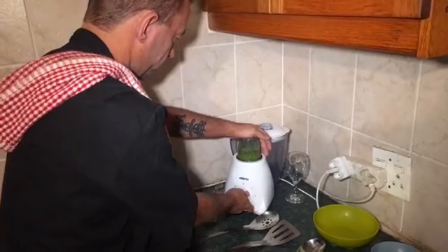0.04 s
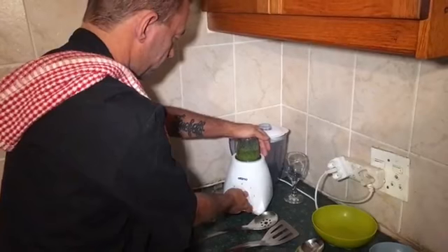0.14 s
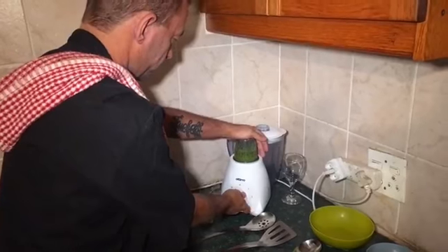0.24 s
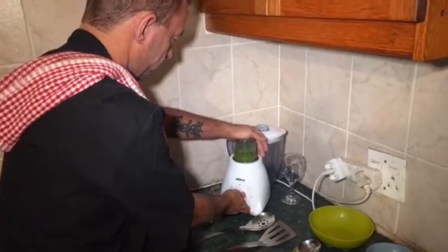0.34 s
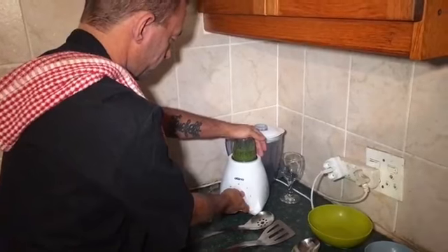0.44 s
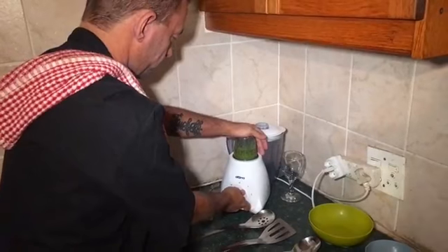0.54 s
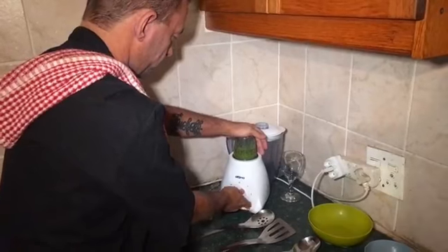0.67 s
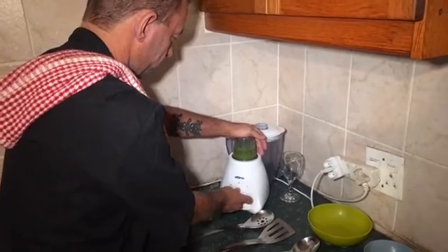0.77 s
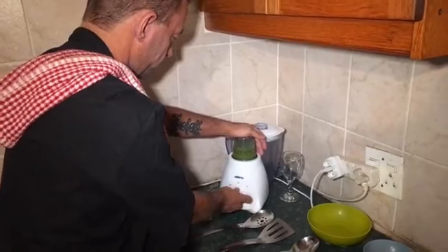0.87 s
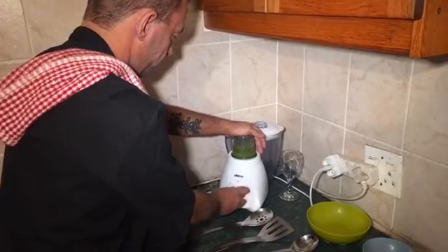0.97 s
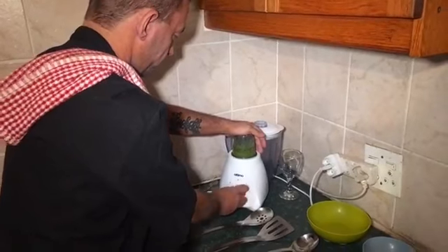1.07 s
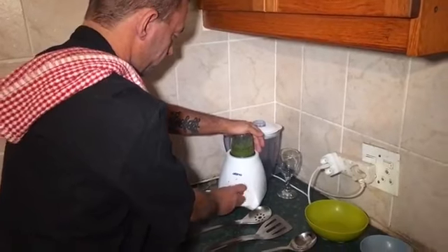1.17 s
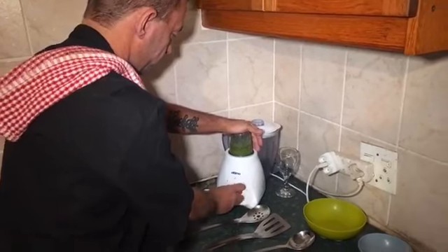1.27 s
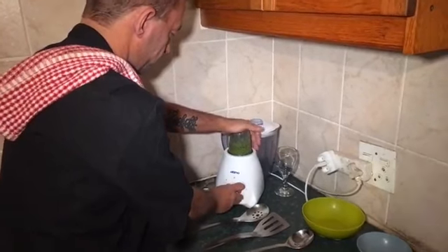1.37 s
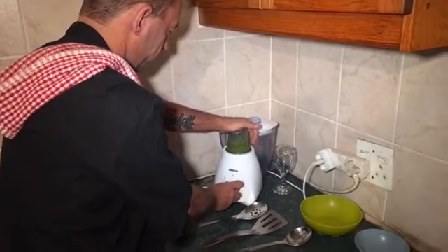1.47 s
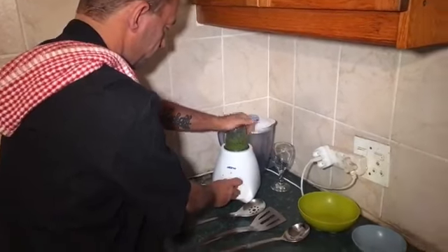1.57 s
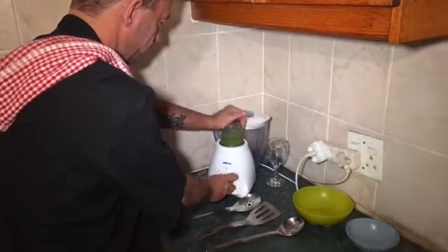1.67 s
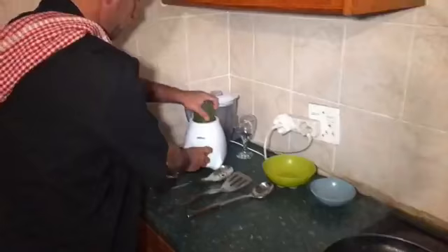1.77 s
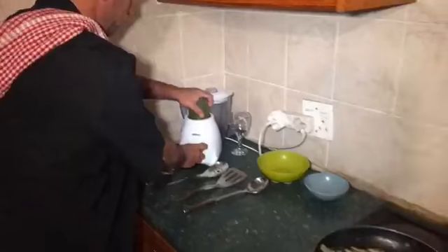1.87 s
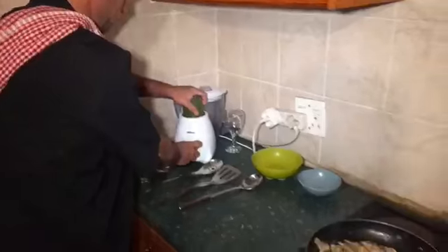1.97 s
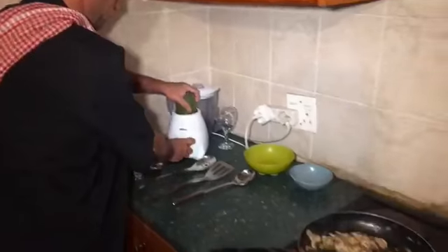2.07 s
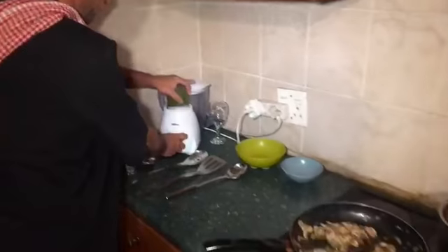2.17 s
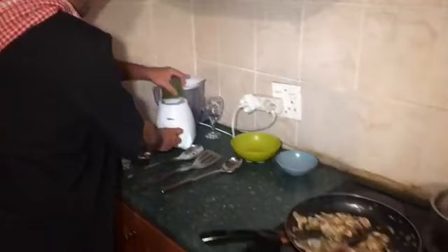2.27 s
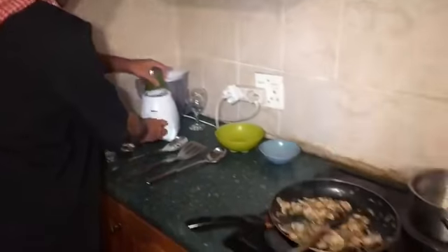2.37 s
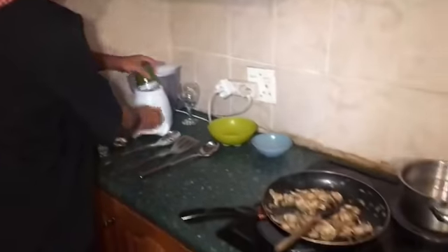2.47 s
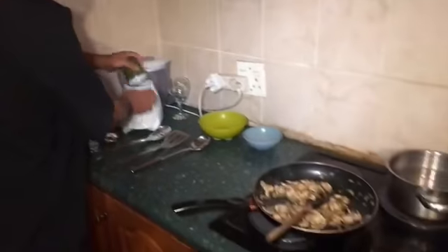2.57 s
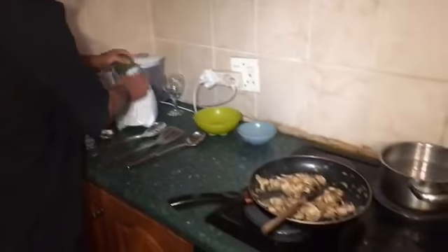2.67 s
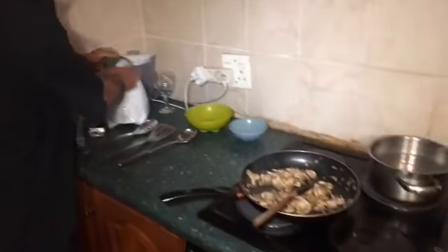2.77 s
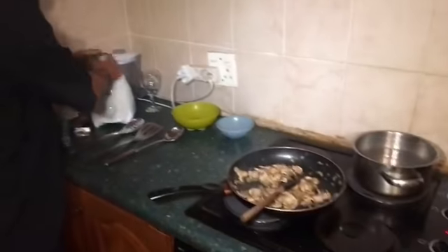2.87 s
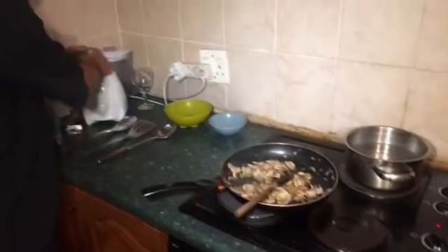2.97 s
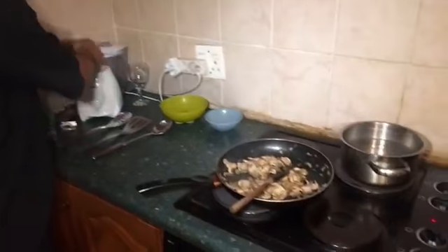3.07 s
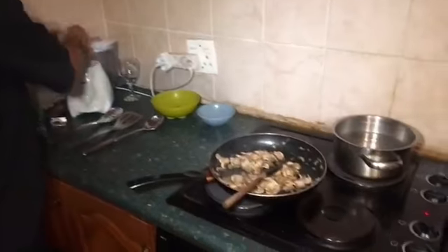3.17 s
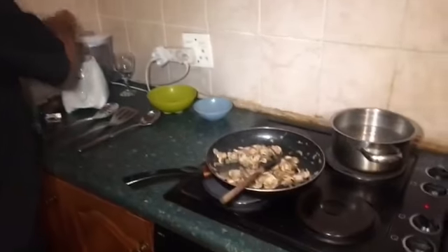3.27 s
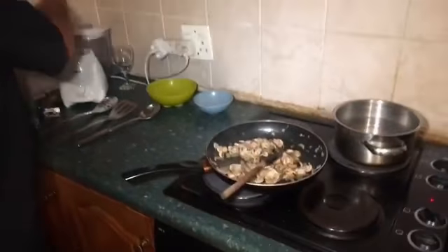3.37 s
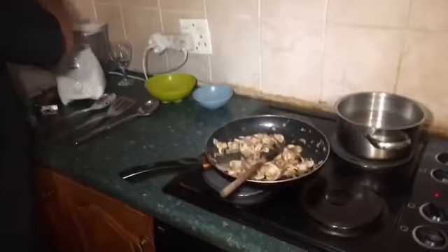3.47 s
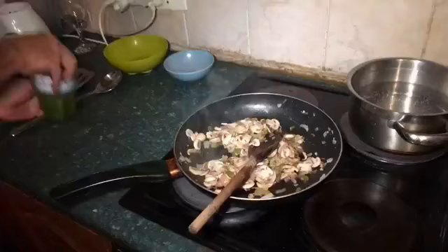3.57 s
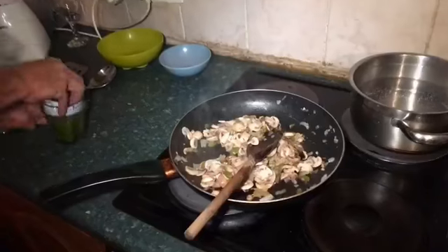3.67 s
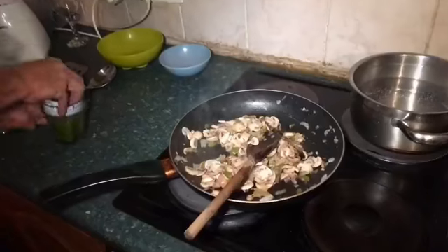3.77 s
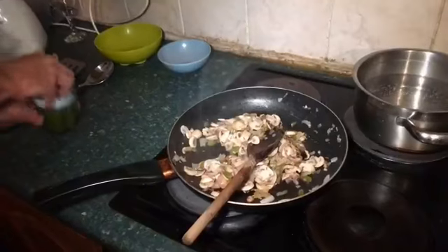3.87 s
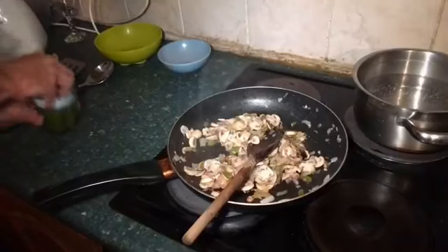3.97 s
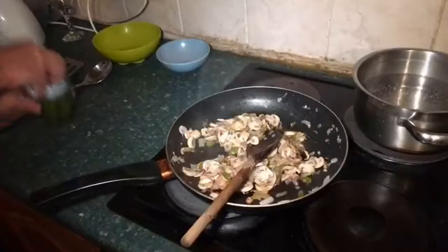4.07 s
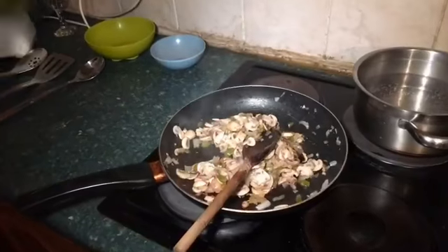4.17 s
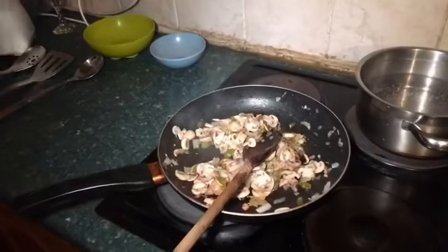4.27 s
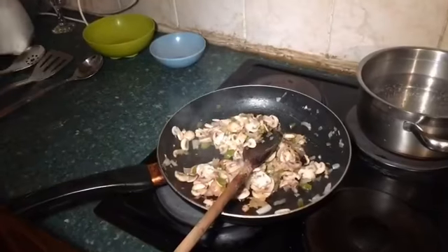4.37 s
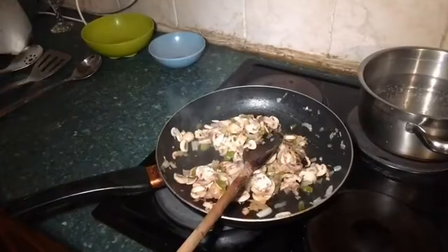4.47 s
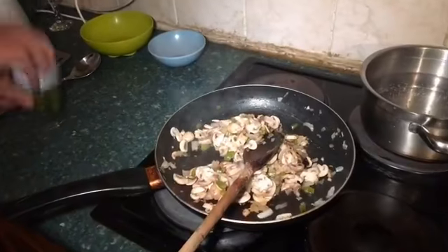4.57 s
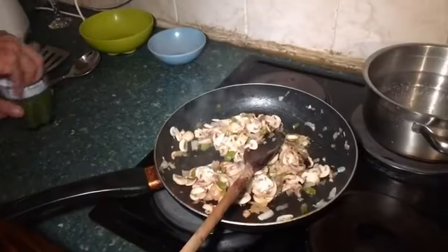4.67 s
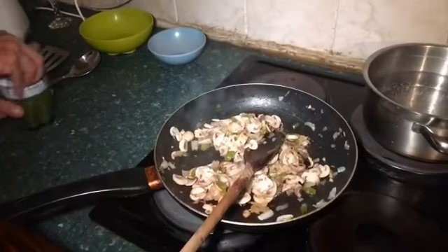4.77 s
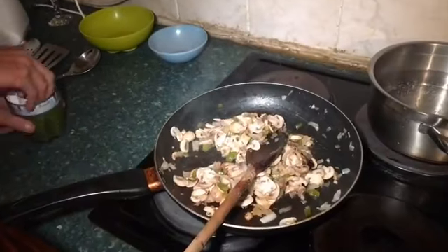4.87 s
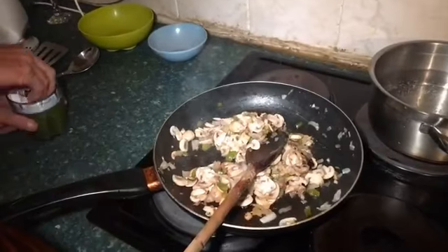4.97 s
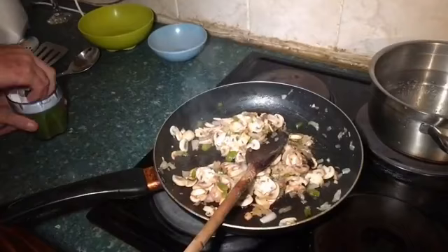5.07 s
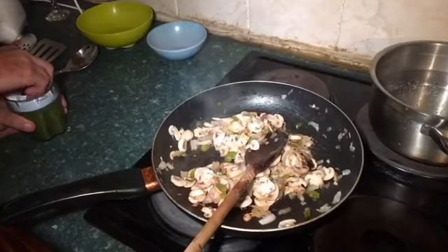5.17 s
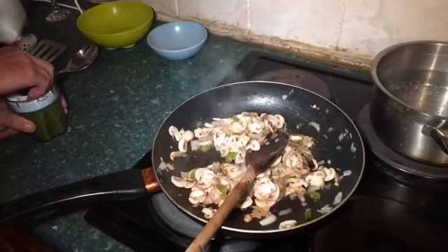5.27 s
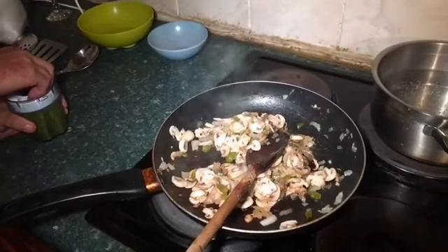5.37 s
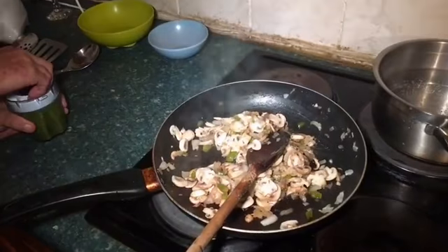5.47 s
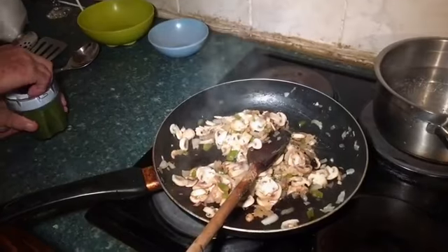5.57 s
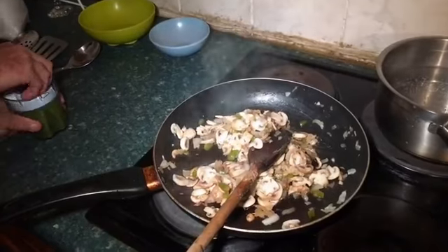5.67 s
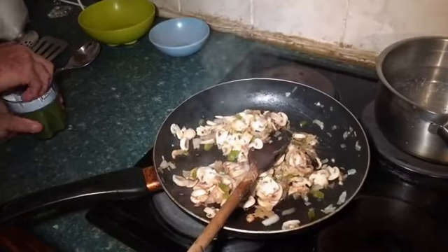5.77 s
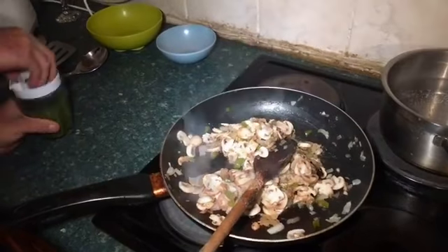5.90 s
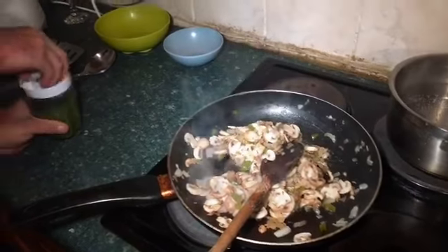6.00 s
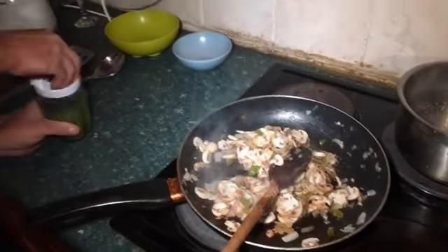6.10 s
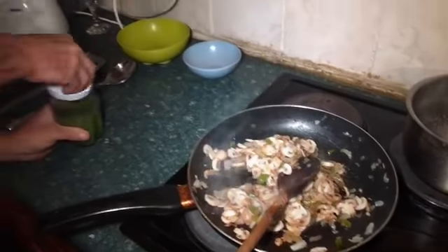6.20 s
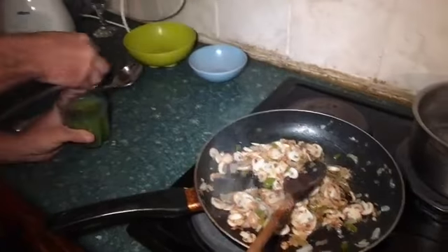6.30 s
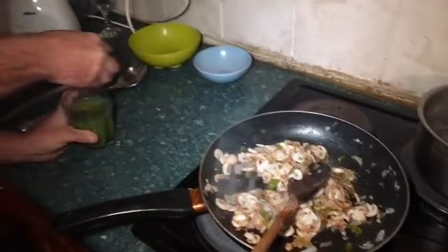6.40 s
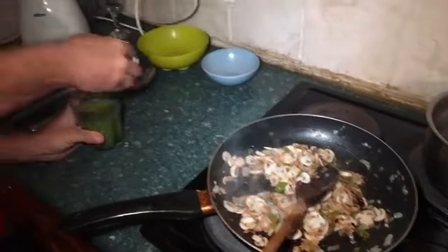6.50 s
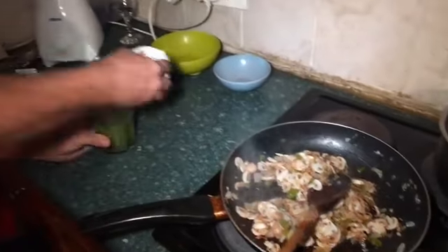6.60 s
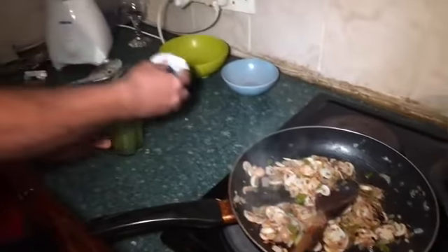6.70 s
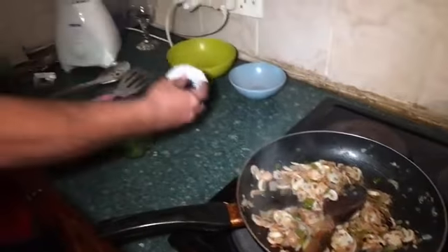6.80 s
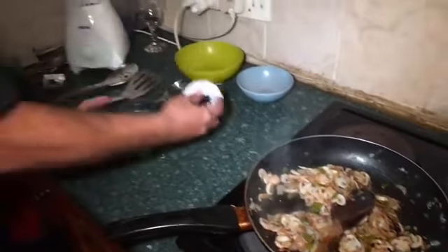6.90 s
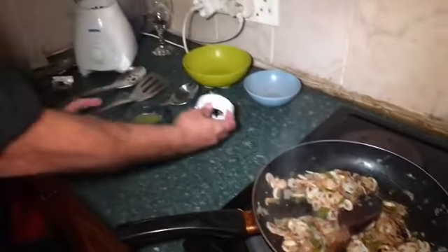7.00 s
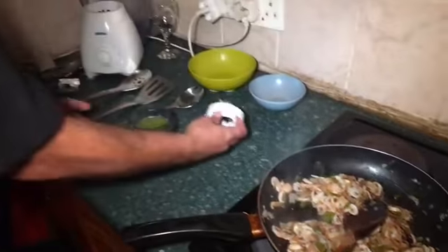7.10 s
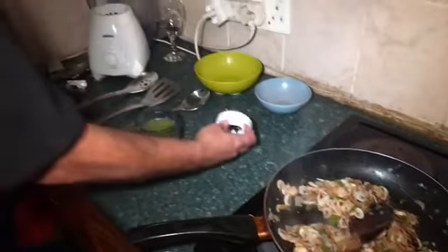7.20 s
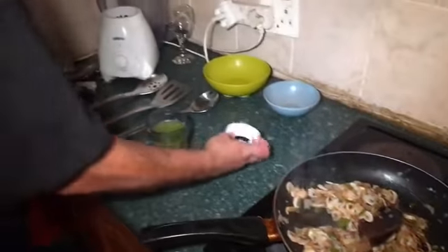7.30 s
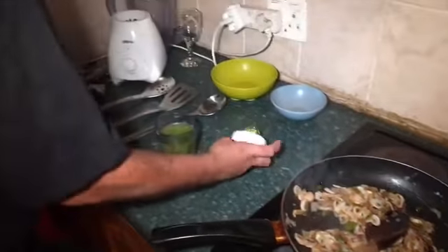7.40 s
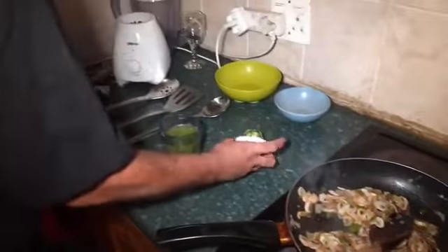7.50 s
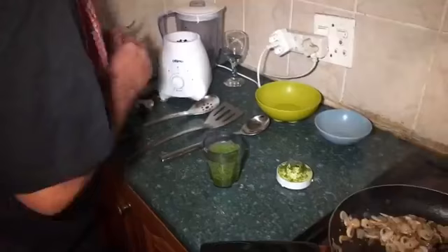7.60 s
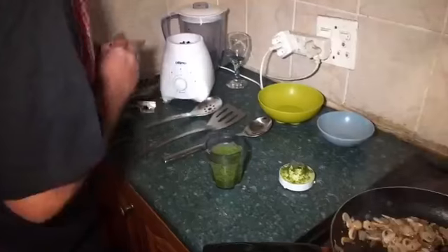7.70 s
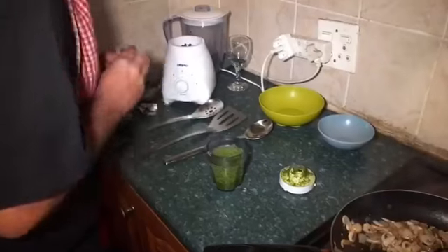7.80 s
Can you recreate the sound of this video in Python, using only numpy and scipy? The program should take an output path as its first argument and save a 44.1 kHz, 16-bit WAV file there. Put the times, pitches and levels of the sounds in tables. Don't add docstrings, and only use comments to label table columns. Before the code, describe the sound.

In a small tiled kitchen, a blender already slowing down churns wet pulp, its housing rattling and hum falling in pitch until it stops after about a second. Quiet frying crackle continues. Faint bumps, then a jar knock and a hard clack on stone, then a lid releasing two short airy spurts, and light ticks. A close handheld microphone picks up low rumbles and handling thumps.

```python
import sys
import numpy as np
from scipy import signal
from scipy.fft import rfft, irfft
from scipy.io import wavfile
from scipy.ndimage import uniform_filter1d

SR = 44100
rng = np.random.default_rng(int(sys.argv[2]) if len(sys.argv) > 2 else 0)


def convert_level_to_amplitude(level_db):
    exponent = np.asarray(level_db, float) / 20
    return 10 ** exponent


def transcribe(u):
    v = np.clip(np.atleast_2d(u).T, -1, 1)
    q = np.round(v * 32767).astype(np.int16)
    wavfile.write(sys.argv[1], SR, q)


N = 346185
T = np.arange(N) / SR

# centre in Hz, width in Hz, level in dB.
MAINS_HUM = [(52.1, 11, -56.5), (98.2, 3.9, -60.5), (146.3, 2.25, -66.5), (255.5, 4.3, -70.5),
             (440, 15, -67)]
# frequency in Hz, density in dB per Hz.
KITCHEN_SPECTRUM = [(71, -28), (120, -19), (173, -6.5), (257, -3), (381, -7.5), (439, -5.5), (498, -4.5),
                    (537, -4.5), (2500, -21.5), (3250, -24), (5500, -120)]
# centre in seconds, deep swing in dB,
# half length in seconds, flutter above the deep swing in dB.
GUSTS = [(0.0, -29.5, 0.058, 8), (0.167, -35, 0.086, 9), (0.397, -47.5, 0.15, 3.5), (0.678, -51, 0.21, 8),
         (1.14, -56, 0.024, -23), (1.37, -41, 0.049, -21), (2.374, -31.5, 0.021, -3),
         (2.53, -40, 0.083, -9), (2.686, -51.5, 0.1, 2.5), (2.795, -42, .03, -15), (2.89, -31, 0.11, -7.5),
         (3.154, -47, .05, -17), (3.31, -39, 0.033, -17), (3.53, -39, 0.046, -8), (3.706, -47.5, 0.032, 6),
         (3.836, -29.5, .07, -19), (4.024, -50.5, 0.023, 14.5), (4.29, -50, 0.25, -13),
         (4.668, -31.5, 0.058, 9), (4.764, -23, 0.06, 1.5), (4.86, -23.5, 0.045, -1),
         (4.97, -36, 0.088, 9.5), (5.267, -44.5, 0.082, -4), (6.256, -48.5, 0.048, 8),
         (6.683, -20, .022, -8), (6.772, -37.5, 0.033, -7), (7.104, -41.5, 0.054, -16),
         (7.284, -30, 0.077, -14), (7.728, -29.5, .04, -12), (7.84, -40, 0.071, 8)]
# start in seconds, peak in dB, frequency in Hz, 60 dB decay in seconds.
JOLTS = [
    (0.001, -14, 60, 0.077),
    (2.358, -23.5, 59, 0.15),
    (4.004, -21, 107, 0.054),
    (4.836, -21, 60, 0.084),
    (6.661, -17, 35.4, 0.28),
    (6.218, -28.5, 115, 0.064),
]
# time in seconds, level in dB.
FRYING_LEVEL = [
    (0.9, -48.5),
    (1.87, -49.5),
    (3.61, -49),
    (4.13, -47.5),
    (4.46, -48),
    (6.9, -47.5),
    (7.3, -48),
    (7.85, -46.5),
]
# frequency in Hz, density in dB per Hz.
SIZZLE_SPECTRUM = [(590, -19), (1000, -13.5), (2020, -16), (2900, -14), (3690, -11), (5000, -8.5),
                   (7000, -3), (9000, -1), (10400, -2.5), (11700, -1.5), (13500, -6.5), (15800, -7)]
# peak time in seconds, peak in dB, rise in seconds, fall in dB per second.
SPURTS = [
    (6.656, -32.5, 0.0042, 240),
    (6.671, -14.5, 0.0025, 540),
    (6.701, -27.5, 0.018, 123),
    (6.769, -29.5, 0.0082, 300),
    (6.797, -33, 0.017, 210),
]
# frequency in Hz, density in dB per Hz.
SPURT_SPECTRUM = [(2350, -44), (4000, -9), (5610, -10.5), (6630, -1.5), (8590, -2), (9420, 0.5),
                  (10400, -4), (14800, 2), (15800, -4.5)]
# start in seconds, level in dB,
# frequency in Hz, length in seconds.
WHISTLES = [(0.001, -31.5, 5100, 0.038), (0.215, -37, 310.4, 0.081), (0.13, -38.5, 2084, 0.056),
            (0.19, -49, 4000, 0.024), (0.58, -48, 5100, 0.034), (5.261, -38.5, 762, 0.034),
            (5.364, -56, 885, 0.029), (5.580, -58, 423, 0.17), (6.212, -46, 4000, 0.0078),
            (6.652, -36, 9500, .022), (6.680, -43, 7550, 0.031), (6.686, -43, 9050, 0.026),
            (6.761, -31.5, 6670, 0.024), (6.760, -34, 9950, .02), (6.787, -34, 9150, 0.018),
            (6.811, -34, 9150, .018), (6.790, -46, 8250, .03)]
# start in seconds, peak in dB, body in Hz, contact in seconds.
BUMPS = [(1.544, -45, 310, 0.0074), (1.683, -43.5, 305, 0.036), (1.844, -40, 310, .016),
         (3.548, -47, 850, 0.019), (4.003, -22, 515, .0055), (5.204, -46, 645, 0.0083),
         (5.2625, -34.5, 714, 0.017), (5.364, -44, 880, 0.019), (6.614, -37, 880, 0.012),
         (7.836, -27, 820, .008), (4.004, -29, 1320, .011), (4.0028, -31, 300, 0.019),
         (4.158, -43, 480, 0.0067), (5.334, -31, 840, 0.015), (5.335, -36, 514, 0.0096),
         (6.213, -36, 255, 0.013), (6.222, -49.5, 1150, 0.049), (6.719, -29, 2380, 0.0046)]
# start in seconds, peak in dB, body in Hz,
# contact in seconds, upper ring in Hz.
CLACKS = [
    (1.426, -41, 317, 0.0076, 3560),
    (1.787, -50.5, 440, 0.027, 3920),
    (1.865, -42.5, 1160, 0.044, 2410),
    (4.836, -16.5, 536, .0043, 3400),
    (4.837, -19.5, 1090, 0.0081, 1410),
    (5.31, -42, 1500, 0.033, 3630),
    (6.688, -24.5, 635, 0.0096, 1070),
]
# start in
# seconds, peak in dB, ring in Hz, contact in seconds.
TICKS = [(2.284, -45.5, 4350, .0045), (2.790, -47, 2370, .005), (3.825, -42, 4280, .003),
         (5.327, -29, 9000, 0.0054), (4.006, -37, 5030, 0.013), (4.836, -19.5, 8560, 0.0062),
         (6.212, -38, 7000, 0.0056), (7.118, -39, 8700, .006), (7.199, -29.5, 11500, 0.0036),
         (7.206, -42, 8300, 0.0026), (7.283, -43, 4000, 0.0074), (7.294, -37.5, 5870, 0.0054),
         (7.304, -44, 3000, .004), (7.491, -44, 11500, 0.0074), (3.965, -40, 8500, .003),
         (4.008, -33, 11000, 0.025), (4.061, -40, 9300, .003)]
# centre in Hz, width in Hz, level in dB.
HOUSING_MODES = [(300, 96, -0.5), (476, 85, -4.5), (762, 34, -2), (774, 32, -1), (1150, 33, -1.5),
                 (1760, 80, -4), (2084, 46, 1.5), (2274, 69, -7.5), (2380, 47, -21), (4000, 74, -15),
                 (5060, 50, -7), (6100, 160, -8)]
# frequency in Hz, density in dB per Hz.
CHURN_SPECTRUM = [(240, -40), (400, -16), (615, -10.5), (729, 1), (961, -9), (1550, -16.5), (2070, -10.5),
                  (3190, -16), (6990, -10), (15800, -19.5)]
# centre in seconds, level in dB, half length in seconds.
SLOSHES = [
    (0.064, -33.5, 0.02),
    (0.153, -40.5, 0.011),
    (0.29, -42.5, 0.026),
    (0.357, -42.5, 0.021),
    (0.444, -44.5, 0.017),
    (0.53, -35.5, 0.018),
    (0.628, -45, 0.019),
    (0.699, -41.5, 0.019),
    (0.772, -45.5, 0.016),
]
# multiple of shaft speed, level in dB.
SHAFT_ORDERS = [(1, 2.5), (2, -9), (3, -18.5), (4, -17)]
OFFSETS = [
    [-.0070],
    [-.0090],
]


def level(x, db):
    return x * convert_level_to_amplitude(db) / np.sqrt(np.mean(x ** 2))


def colour(x, shape):
    hz, db = np.transpose(shape)
    log_hz = np.log(np.arange(N // 2 + 1) * SR / N + 1)
    return level(irfft(rfft(x) * convert_level_to_amplitude(np.interp(log_hz, np.log(hz), db)), N), 0)


def ring(x, hz, width):
    return signal.lfilter(*signal.iirpeak(hz, hz / width, fs=SR), x)


def band(x, lo_hz, hi_hz, order=2):
    sos = signal.butter(order, [lo_hz, hi_hz], "band", fs=SR, output="sos")
    return level(signal.sosfilt(sos, x), 0)


def noise():
    return rng.standard_normal(N)


def walk(rate):
    k = int(SR / rate)
    held = np.repeat(rng.standard_normal(N // k + 1), k)
    return 1.38 * uniform_filter1d(uniform_filter1d(held, k), k)[:N]


def even(x, span_s):
    return x / np.sqrt(uniform_filter1d(x ** 2, int(span_s * SR)) + 0.047)


def add(out, s, sound):
    i = int(s * SR)
    out[i:i + len(sound)] += sound[:N - i]


def kitchen():
    hum = sum(level(ring(ring(noise(), hz, width), hz, width), db) for hz, width, db in MAINS_HUM)
    return hum + colour(noise(), KITCHEN_SPECTRUM) * convert_level_to_amplitude(-60 + 2.9 * walk(5.2))


def jolt(hz, t60):
    t = T[:int(0.3 * SR)]
    return np.sin(2 * np.pi * hz * t) * 1000. ** (-t / t60)


def draught():
    deep_level = convert_level_to_amplitude(-56.5 + 4.5 * walk(9))
    flutter_level = convert_level_to_amplitude(-60)
    for s, db, half_s, up_db in GUSTS:
        swell = np.exp(-((T - s) / half_s) ** 2)
        deep_level = deep_level + convert_level_to_amplitude(db) * swell
        flutter_level = flutter_level + convert_level_to_amplitude(db + up_db) * swell
    deep = even(band(noise(), 18.9, 47.0, order=3), 0.078)
    flutter = even(band(noise(), 42.7, 126, order=3), 0.0604) + 0.18 * band(noise(), 154, 288)
    out = convert_level_to_amplitude(-2.5) * (deep_level * deep + flutter_level * convert_level_to_amplitude(2.8 * walk(35)) * flutter)
    for s, db, hz, t60 in JOLTS:
        add(out, s, -convert_level_to_amplitude(db) * jolt(hz, t60))
    return out


def frying():
    bursts_per_s = 1500
    bursts = (rng.random(N) < bursts_per_s / SR) * convert_level_to_amplitude(1.6 * rng.exponential(1, N)) * noise()
    smear = rng.standard_normal(160) * np.exp(-np.arange(160) / 30)
    pops = level(signal.fftconvolve(bursts, smear)[:N], 3.1)
    patches = np.zeros(N)
    for lo_hz in 700 * 2 ** np.arange(0, 4.6, 0.5):
        patch = np.sqrt(lo_hz) * band(noise() + pops, lo_hz, min(lo_hz * 2 ** 0.5, 20000))
        patches += patch * convert_level_to_amplitude(0.5 * walk(11) + 0.45 * walk(2.59))
    spit = convert_level_to_amplitude(0.8 * walk(22))
    s, db = np.transpose(FRYING_LEVEL)
    return colour(patches, SIZZLE_SPECTRUM) * spit * convert_level_to_amplitude(np.interp(T, s, db) + 2)


def whistle(hz, length_s):
    t = T[:int(length_s * SR)]
    n = len(t)
    swell = np.sqrt(np.sin(np.pi * t / length_s)) * convert_level_to_amplitude(2.4 + 3.1 * walk(147)[:n])
    cycles = hz * np.cumsum(1 + 0.0041 * walk(190)[:n]) / SR
    return swell * np.sin(2 * np.pi * cycles)


def lid():
    flow = np.zeros(N)
    for s, db, rise_s, fall_db in SPURTS:
        fall = convert_level_to_amplitude(db - fall_db * np.maximum(T - s, 0))
        flow += fall * np.exp(np.clip((T - s) / rise_s, -50, 0))
    sputter = convert_level_to_amplitude(1.0 * walk(820) + 1.4 * walk(160))
    jet = colour(noise(), SPURT_SPECTRUM) + convert_level_to_amplitude(-17.5) * band(noise(), 310, 2540)
    out = flow * sputter * jet
    for s, db, hz, length_s in WHISTLES:
        add(out, s, convert_level_to_amplitude(db) * whistle(hz, length_s))
    return out


def knock(hz, contact, crack_db, upper_hz):
    (grit, crack), t = rng.standard_normal((2, 4096)), T[:4096]
    push = np.exp(-(t / contact) ** 2) * np.clip(t / 0.00027, 0, 1)
    body = ring(push * grit, hz, 0.12 * hz)
    upper = ring(push * crack, upper_hz, 0.051 * upper_hz)
    thud = signal.lfilter([0.2], [1, -0.9], grit) * push
    dulled = signal.lfilter(*signal.butter(1, 9000, fs=SR), crack)
    chatter = dulled * (0.99 * push + 0.5 * np.exp(-t / 0.02))
    sharp = convert_level_to_amplitude(crack_db - 2.5) * (upper / np.abs(upper).max() + chatter)
    return body / np.abs(body).max() + convert_level_to_amplitude(-33.5) * thud + sharp


def tick(hz, contact):
    t = T[:2048]
    push = np.exp(-(t / contact) ** 2) + 0.4 * np.exp(-t / 0.018)
    sound = ring(rng.standard_normal(len(t)) * push, hz, 0.49 * hz)
    return sound / np.abs(sound).max()


def knocks():
    out = np.zeros(N)
    for s, db, hz, contact in BUMPS:
        add(out, s, convert_level_to_amplitude(db) * knock(hz, contact, -23.5, 2 * hz))
    for s, db, hz, contact, upper_hz in CLACKS:
        add(out, s, convert_level_to_amplitude(db) * knock(hz, contact, -4.5, upper_hz))
    for s, db, hz, contact in TICKS:
        add(out, s, convert_level_to_amplitude(db + 4) * tick(hz, contact))
    return out


def room(x):
    t60_s, tail_db = 0.39, -14.5
    t = T[:int(0.6 * SR)]
    tail = rng.standard_normal(len(t)) * 1000. ** (-t / t60_s) * np.clip(t / 0.003, 0, 1)
    tail = signal.lfilter(*signal.butter(1, [820, 2620], "band", fs=SR), tail)
    return x + convert_level_to_amplitude(tail_db) * signal.fftconvolve(x, tail / np.sqrt(np.sum(tail ** 2)))[:N]


def blender():
    start_hz, coast_s, stall_s, stall_fade_s = 210.3, 0.81, 1.01, 0.11
    hz = start_hz * np.exp(-T / coast_s)
    lost = T / coast_s / np.log(2)
    turn = 2 * np.pi * np.cumsum(hz * (1 + 0.013 * walk(29.5))) / SR
    beat = 1 + 0.09 * np.cos(2 * turn)
    lumps = convert_level_to_amplitude(walk(90.9))

    drive = noise() * beat * lumps
    rattle = level(sum(convert_level_to_amplitude(db) * ring(drive, f, width) for f, width, db in HOUSING_MODES), 0)
    rattle = rattle * convert_level_to_amplitude(1.2 * walk(26.6))
    hiss = colour(noise() * beat, CHURN_SPECTRUM) * lumps
    churn = convert_level_to_amplitude(-33.5 - 13.5 * lost) * rattle + convert_level_to_amplitude(-28.5 - 12.5 * lost) * hiss
    settled = convert_level_to_amplitude(-1.5 * np.clip((T - 0.39) / 0.015, 0, 1))

    shaft = np.zeros(N)
    for k, db in SHAFT_ORDERS:
        shaft += convert_level_to_amplitude(db + 2.7 * walk(24.3)) * np.sin(k * turn + 0.41 * walk(30.7))
    stand_db = 9 / (1 + ((hz - 108) / 24) ** 4)
    hum = convert_level_to_amplitude(-42 - 8.5 * lost + stand_db) * shaft

    running = np.clip((stall_s - T) / stall_fade_s, 0, 1)
    slosh = sum(convert_level_to_amplitude(db) * np.exp(-((T - s) / half_s) ** 2) for s, db, half_s in SLOSHES)
    return running * (settled * churn + hum) + slosh * (hiss + 0.59 * rattle)


def scene():
    mono = kitchen() + draught() + frying() + lid() + room(knocks()) + blender()
    return np.array([mono, mono])


def band_limit(x):
    return signal.sosfilt(signal.butter(12, 16060, fs=SR, output="sos"), x)


def record(dry):
    top_cut = signal.ellip(10, 0.2, 70, 15750, fs=SR, output="sos")
    mix = signal.sosfilt(top_cut, dry) + np.array(OFFSETS)
    return band_limit(mix)


dry = scene()
out = record(dry)
transcribe(out)
```